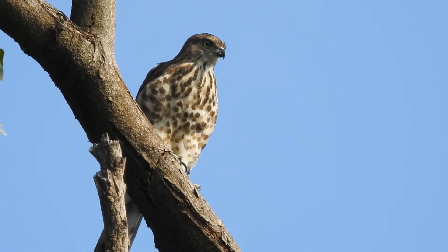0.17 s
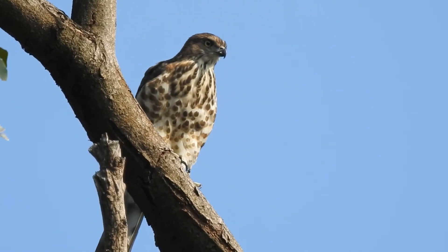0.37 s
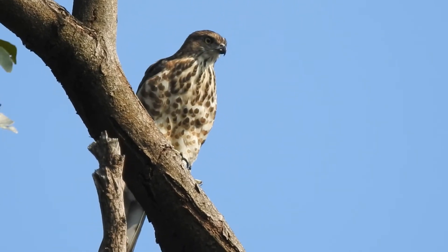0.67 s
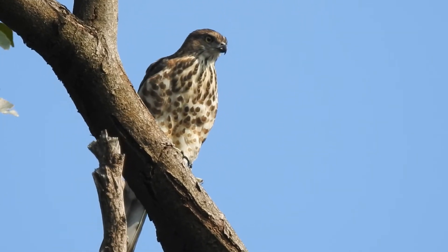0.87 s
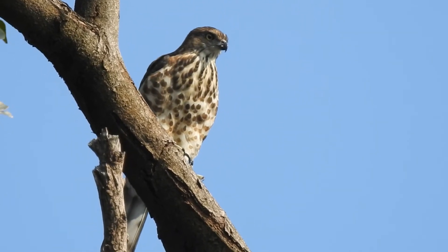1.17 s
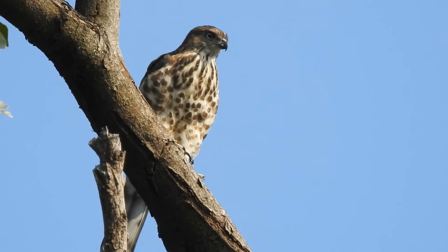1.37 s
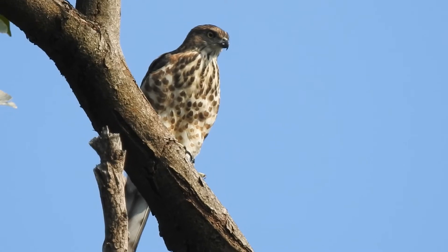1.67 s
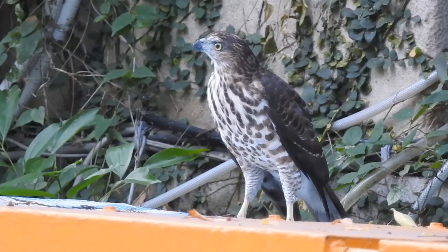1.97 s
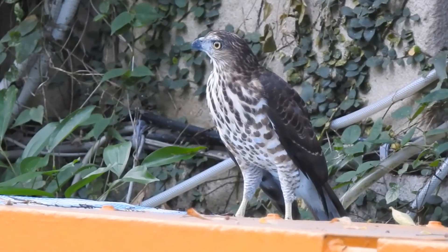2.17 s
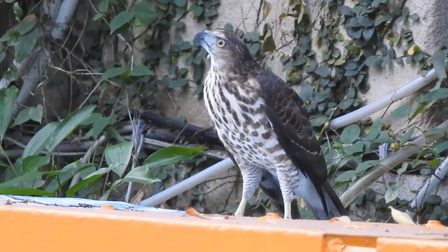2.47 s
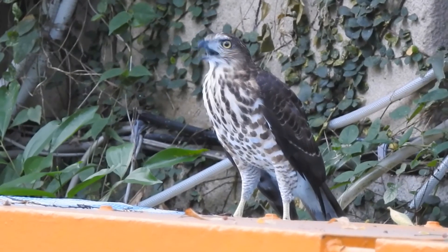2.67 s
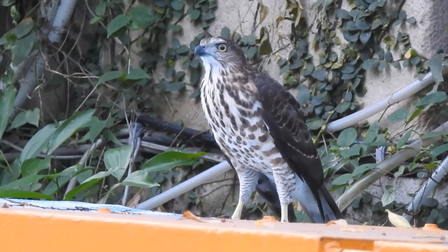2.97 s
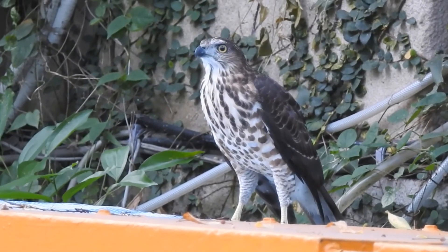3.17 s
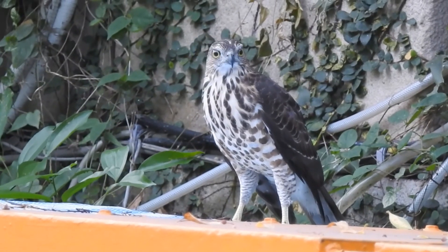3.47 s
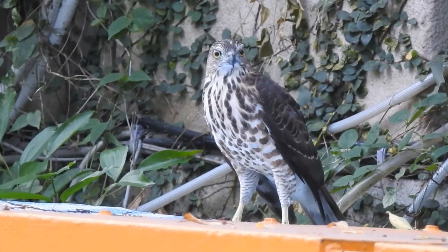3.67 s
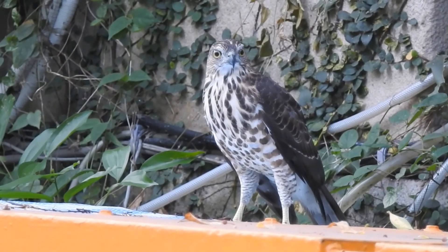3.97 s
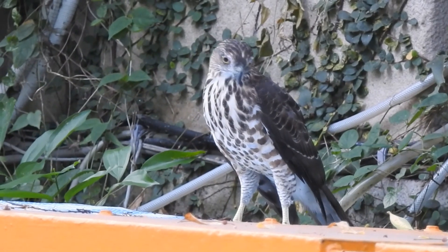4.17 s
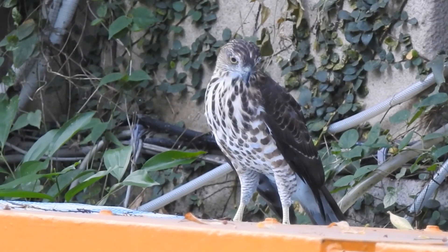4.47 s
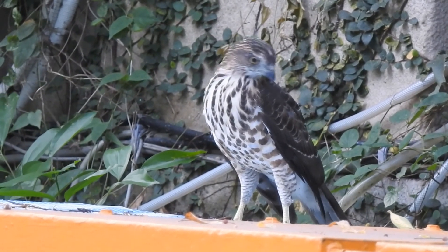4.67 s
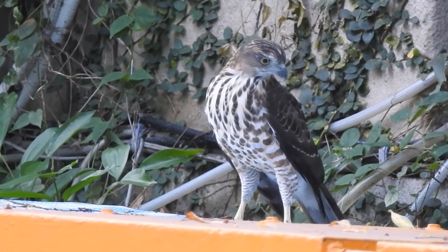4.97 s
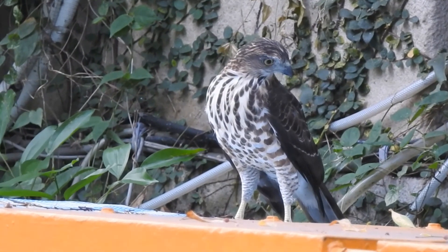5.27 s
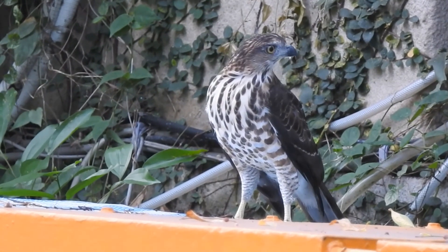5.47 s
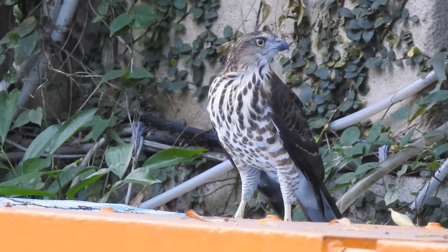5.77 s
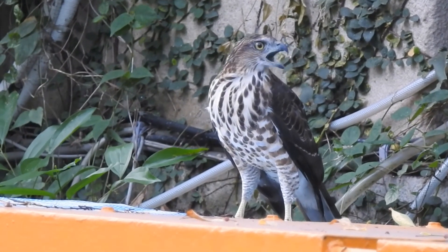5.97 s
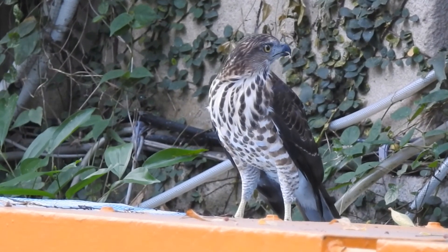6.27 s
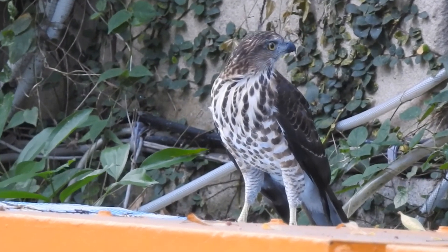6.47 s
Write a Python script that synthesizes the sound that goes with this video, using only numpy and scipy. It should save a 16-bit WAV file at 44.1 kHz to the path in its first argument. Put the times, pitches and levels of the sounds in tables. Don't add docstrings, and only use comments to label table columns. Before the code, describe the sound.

A camera's stereo microphone catches muffled gusts, distant vehicles and a bright rustling hiss, sinking to silence at two seconds. Next, a steady metallic ventilation hum swells in among walls. Small high chirps come in a quick cluster, overlapped by a wavering, very high brake squeal from afar with light echoes. The drone continues almost alone, with a faint scrape, until another brief falling chirp.

```python
import sys
import numpy as np
from scipy import signal
from scipy.fft import rfft, irfft, next_fast_len
from scipy.io import wavfile
from scipy.ndimage import uniform_filter1d, map_coordinates

SR = 44100
rng = np.random.default_rng(int(sys.argv[2]) if len(sys.argv) > 2 else 0)


def boost(x):
    u = np.asarray(x, float) / 20
    return 10 ** u


def pcm_store(signal):
    levels = np.round(np.clip(np.atleast_2d(signal), -1, 1) * 32767)
    wavfile.write(sys.argv[1], SR, levels.astype(np.int16).T)


N = 291501
T = np.arange(N) / SR

# (frequency [Hz], correlation [-1 to 1])
TREE_COHERENCE = [(60, 0.89), (530, 1), (1100, 0.93), (2300, 0.79), (4750, 0.6), (6000, 0.13),
                  (9800, -0.26)]
# (frequency [Hz], correlation [-1 to 1])
YARD_COHERENCE = [(60, 0.99), (260, 1), (530, 0.98), (1100, 0.92), (2300, 0.83), (4750, 0.67), (6000, 0.42),
                  (9800, 0.088)]


def unit(x):
    return x / np.sqrt(np.mean(np.abs(x) ** 2) + 1e-20)


def along(points, hz, col=1):
    p = np.transpose(points)
    return np.interp(np.log(hz + 1), np.log(p[0] + 1), p[col])


def curves(rows):
    s, *cols = np.transpose(rows)
    return [np.interp(T, s, c) for c in cols]


def peaks(rows, floor_db):
    humps = []
    for s, db, half_width in rows:
        hump = db - 6 * ((T - s) / half_width) ** 2
        humps.append(np.maximum(hump, floor_db))
    return np.max(humps, axis=0)


def wobble(rate):
    return map_coordinates(rng.standard_normal(N // 100), [T * rate])


def filtered(x, response):
    m = next_fast_len(N + SR // 2)
    return irfft(rfft(x, m) * response(np.fft.rfftfreq(m, 1 / SR)), m)[..., :N]


def rush(colour_db, coherence, patchy_db):
    z = signal.stft(rng.standard_normal((2, N)), nperseg=512)[2]
    field = uniform_filter1d(rng.standard_normal(z.shape[1:]), size=5, axis=0)
    field = uniform_filter1d(field, size=12, axis=1)
    pair = signal.istft(z * boost(patchy_db * unit(field)), nperseg=512)[1][:, :N]

    def mid_side(hz):
        angle = np.arccos(np.clip(along(coherence, hz), -1, 1)) / 2
        return boost(colour_db(hz)) * [np.cos(angle), np.sin(angle)]

    mid, side = filtered(pair, mid_side)
    return unit(np.array([mid + side, mid - side]))


def stirs(rows, spread, coherence):
    total = np.zeros((2, N))
    for s, hz, db, length in rows:
        envelope = boost(db - 4.3 * ((T - s) / length) ** 2)
        band_db = lambda f: -9 * ((f / hz - 1) / spread) ** 2
        total += envelope * rush(band_db, coherence, patchy_db=2.5)
    return total


def walls(x, t60):
    t = np.arange(SR // 2) / SR
    decay = boost(-60 * t / t60) * (t > .018)
    tail = rng.standard_normal((2, len(t))) * decay
    return signal.fftconvolve(x[None], tail / np.linalg.norm(tail[0]), axes=1)[:, :N]


def gusts():
    # (time [s], level [dB])
    pressure = [
        (0, -30),
        (.95, -35),
        (1.08, -45),
        (1.3, -49),
        (1.98, -34.5),
    ]
    # (time [s], level over the pressure [dB])
    pushes = [
        (.1, 0.5),
        (.43, 4),
        (.62, 8),
        (.91, 6.5),
        (1.35, 8),
        (1.47, 8),
    ]
    # (frequency [Hz], density [dB per Hz])
    thud_spectrum = [(18, -72), (30, -36), (55, -11.5), (100, -3.5), (135, -14.5), (200, -19), (400, -120)]
    push_s = 0.029
    level_db, = curves(pressure)
    push_db = peaks([(s, db, push_s) for s, db in pushes], 0)
    thud = rush(lambda hz: along(thud_spectrum, hz), [(30, 0.59)], patchy_db=0.0)
    return boost(level_db + push_db) * thud


def wind():
    # (time [s], peak level [dB])
    eddies = [
        (0, -37.5),
        (.52, -42),
        (.86, -33),
        (1.1, -23),
        (1.53, -30.5),
    ]
    # (frequency [Hz], density [dB per Hz])
    eddy_spectrum = [(50, -120), (80, -18), (130, -5.5), (220, -6), (330, -37.5), (480, -18), (900, -120)]
    eddy_s, lull_db = 0.086, -42.5
    level_db = peaks([(s, db, eddy_s) for s, db in eddies], lull_db)
    own_port = np.array([wobble(10), wobble(16.4)])
    lumps = boost(2.5 * wobble(9) + 1.7 * own_port)
    noise = rush(lambda hz: along(eddy_spectrum, hz), [(30, .1)], patchy_db=6.5)
    return boost(level_db) * unit(lumps * noise)


def traffic():
    # (frequency [Hz], density [dB per Hz])
    roar_spectrum = [(18, -77), (60, -35), (110, -13.5), (170, 0.5), (283, -2.5), (336, -5), (533, -7),
                     (650, -2), (778, -12.5), (1170, -14), (1280, -18.5), (1800, -20), (2340, -46),
                     (3960, -120)]
    # (time [s], level [dB], half width [s])
    passing = (0.86, 3.1, 0.16)
    level_db = -29.5 + 0.5 * T + peaks([passing], 0)
    return boost(level_db) * rush(lambda hz: along(roar_spectrum, hz), TREE_COHERENCE, patchy_db=1.2)


def leaves():
    # (frequency [Hz], density [dB per Hz])
    leaf_spectrum = [(880, -34), (1500, -8.5), (1940, -6), (2170, -1), (2370, -2.5), (2590, -2), (2880, -3),
                     (3470, 0), (3980, -7), (4420, -1.5), (5190, -3.5), (6350, 4), (7160, 0.5),
                     (10300, -21.5), (13400, -63), (22000, -120)]
    # (time [s], centre [Hz], level [dB], length [s])
    rustles = [
        (.885, 3400, -42, .025),
        (.97, 3200, -43, .04),
        (1.08, 6400, -36, .028),
        (.81, 2600, -45, .02),
        (.2, 3300, -46, .05),
        (1.1, 830, -40, .2),
    ]
    level_db = -32.5 + 0.1 * T + .4 * wobble(3.3)
    bed = boost(level_db) * rush(lambda hz: along(leaf_spectrum, hz), TREE_COHERENCE, patchy_db=1.84)
    return bed + stirs(rustles, spread=0.15, coherence=TREE_COHERENCE)


def hum(level_col):
    # (frequency [Hz], level in the yard [dB], level in the treetop [dB], blur [Hz])
    drive_tones = [(619, -33.5, -41, 2), (1082, -45.5, -66, 2), (1174, -49, -56, 2), (1563, -52, -64, 3),
                   (2241, -54, -61, 4), (2272, -54, -66, 4), (2511, -55, -58, 3), (3246, -55, -62, 4)]
    tones = np.zeros((2, N))
    for row in drive_tones:
        hz, blur_hz = row[0], row[3]
        skirt = .5 * (wobble(7 * blur_hz) + 1j * wobble(7 * blur_hz))
        apart = 0.1 * hz / 1000 * wobble(26)
        phase = 2 * np.pi * hz * T + 0.66 * wobble(blur_hz) + np.array([apart, -apart])
        tones += boost(row[level_col] + 1.8) * np.real((1 + skirt) * np.exp(1j * phase))
    return tones


def treetop():
    return gusts() + wind() + traffic() + leaves() + hum(level_col=2)


def plant():
    # (frequency [Hz], density [dB per Hz])
    drone_spectrum = [(18, -60), (30, -30), (74, -5), (140, -4.5), (219, -0.5), (303, -10), (372, -11.5),
                      (473, -12.5), (633, -6), (739, -21.5), (1080, -16.5), (1570, -27), (1800, -55),
                      (2340, -60), (3960, -120)]
    # (frequency [Hz], density [dB per Hz])
    air_spectrum = [(880, -27.5), (1500, -1), (1610, -3.5), (1820, -5.5), (2190, -1.5), (2370, -7.5),
                    (2590, -2.5), (2740, -7), (3360, -4.5), (4040, -6.5), (4490, -4.5), (6710, 1),
                    (9570, -18), (10300, -26), (13400, -56), (22000, -120)]
    # (frequency [Hz], width [Hz], lift [dB])
    housing_modes = [(90.4, 41, 3), (177.4, 11.3, 5.5), (226, 37, 6), (375, 63, 10), (652.7, 8.1, 7.5),
                     (788, 11, 8.5), (1541, 37, 4), (1680, 50, 6), (2255, 30, 7.5), (2470, 32, 5.5),
                     (3176, 90, 5), (3420, 36, 7.5), (3970, 170, -4.5)]

    def lift(hz):
        return sum(db / (1 + (2 * (hz - centre) / width) ** 4) for centre, width, db in housing_modes)

    drone = rush(lambda hz: along(drone_spectrum, hz) + lift(hz), YARD_COHERENCE, patchy_db=1.34)
    air = rush(lambda hz: along(air_spectrum, hz) + lift(hz), YARD_COHERENCE, patchy_db=1.07)
    return boost(-23 + 0.14 * wobble(4.39)) * drone + boost(-30 + 0.45 * wobble(6.5)) * air


def bird(notes, half_db):
    sag = 1.5
    edge_db = -8
    song = np.zeros(N)
    waver = 1 + .006 * wobble(260)
    flutter_db = 1.3 * wobble(110) + 2.2 * wobble(320)
    for s, length, from_hz, to_hz, db in notes:
        u = np.clip((T - s) / length, 0, 1)
        on = np.clip(np.minimum(u, 1 - u) * length / .004, 0, 1)
        hz = (to_hz + (from_hz - to_hz) * (1 - u) ** sag) * waver
        phase = 2 * np.pi * np.cumsum(hz) / SR
        level_db = db + 6 + edge_db * (2 * u - 1) ** 2 + flutter_db
        song += on * boost(level_db) * (np.sin(phase) + boost(half_db) * np.sin(phase / 2))
    return song


def birds():
    # (time [s], length [s], start pitch [Hz], end pitch [Hz], peak level [dB])
    whistles = [
        (2.655, .026, 4930, 4830, -34),
        (2.678, .036, 4830, 4730, -31),
        (2.712, .036, 4560, 4360, -33),
        (2.748, .03, 4280, 4050, -43),
        (6.064, .022, 5050, 4750, -36),
        (6.082, .034, 4720, 4480, -32),
        (6.112, .022, 4450, 4380, -27.5),
        (6.122, .014, 4400, 4170, -32),
        (6.134, .02, 4400, 4600, -35),
        (6.158, .024, 4450, 4450, -34),
    ]
    # (time [s], length [s], start pitch [Hz], end pitch [Hz], peak level [dB])
    cheeps = [
        (2.846, .018, 6130, 6200, -28),
        (2.86, .016, 6250, 6480, -33),
        (2.874, .026, 6400, 6150, -33),
        (2.915, .045, 6400, 6150, -39),
        (2.976, .014, 7050, 6750, -33),
        (2.988, .012, 6500, 6150, -34),
        (2.998, .014, 6000, 5700, -39),
    ]
    song = bird(whistles, half_db=-40) + bird(cheeps, half_db=-9)
    return song + boost(-1.5) * walls(song * unit(.7 + wobble(430)), t60=.7)


def squeal():
    # (time [s], pitch [Hz], level [dB])
    drag = [
        (2.93, 7600, -41),
        (3.06, 7622, -30),
        (3.25, 7612, -26),
        (3.42, 7595, -30),
        (3.52, 7562, -39),
        (3.72, 7608, -33),
        (3.95, 7622, -34),
        (4.2, 7630, -43),
    ]
    # (time [s], level over the drag [dB], half width [s])
    surges = [(2.982, 8.5, .012), (3.051, 5.5, 0.041), (3.132, 3, 0.013), (3.178, 5, 0.018),
              (3.226, 7.5, 0.027), (3.275, 6, 0.031), (3.294, 11, .01), (3.35, 6.5, 0.027),
              (3.416, 7.5, 0.02), (3.455, 10, 0.0067), (3.53, 12, .012), (3.6, 4, .018), (3.645, 9.5, 0.017),
              (3.699, 8.5, 0.012), (3.738, 11, 0.015), (3.79, 3, 0.013), (3.83, 9, 0.013), (3.878, 3, 0.022),
              (3.942, 4.5, .02), (4.1, 1, .02)]
    hz, drag_db = curves(drag)
    surge_db = peaks(surges, -5.5)
    chatter_db = 1.8 * wobble(110)
    braking = (T > drag[0][0]) * (T < drag[-1][0])
    swell = boost(drag_db + surge_db + chatter_db) * braking
    phase = 2 * np.pi * np.cumsum(hz + 10 * wobble(60)) / SR + .6 * wobble(70)
    tone = np.exp(1j * phase) + boost(-22.5) * np.exp(1.103j * phase)
    scattered = uniform_filter1d(swell, size=SR // 16) * unit(wobble(62) + 1j * wobble(62))
    front = np.real(swell * tone)
    sides = boost(2.5) * np.real(scattered * tone)
    echoes = walls(front * unit(.6 + wobble(120)), t60=.4)
    return np.array([front + sides, front - sides]) + boost(-10) * echoes


def scrapes():
    # (time [s], centre [Hz], level [dB], length [s])
    small_stirs = [
        (4.635, 3250, -38, .028),
        (4.64, 2950, -39, .018),
        (4.65, 3500, -40, .025),
        (4.56, 1070, -42, .06),
        (3.06, 5900, -40, .08),
        (4.91, 2250, -43, .025),
    ]
    return stirs(small_stirs, spread=0.056, coherence=YARD_COHERENCE)


def yard():
    return plant() + hum(level_col=1) + birds() + squeal() + scrapes()


def scene():
    change_s, fade_out_s, fade_in_s = 1.985, 0.95, 1
    out_gain = np.clip((change_s - T) / fade_out_s, 0, 1)
    in_gain = np.clip((T - change_s) / fade_in_s, 0, 1)
    return out_gain * treetop() + in_gain * yard()


def roll_off(x):
    return signal.sosfilt(signal.butter(12, 10440, fs=SR, output="sos"), x)


def record(dry):
    # (frequency [Hz], left over right [dB], left lead [rad])
    port_mismatch = [(100, 0, 0.029), (650, 0, -0.17), (1050, -1.5, -.12), (1800, -2.5, 0.019),
                     (3200, -1.5, 0.016), (5600, 0, 0.039)]
    half = np.array([[.5], [-.5]])

    def ports(hz):
        gain = boost(half * along(port_mismatch, hz))
        lead = np.exp(1j * half * along(port_mismatch, hz, col=2))
        return gain * lead * (hz < 10500)

    return roll_off(filtered(dry, ports))


dry = scene()
out = record(dry)
pcm_store(out)
```